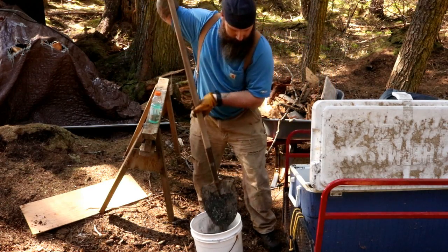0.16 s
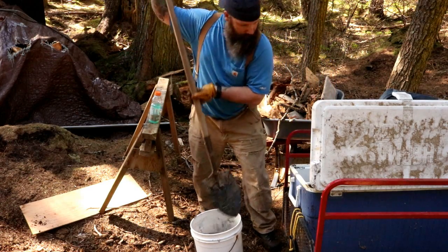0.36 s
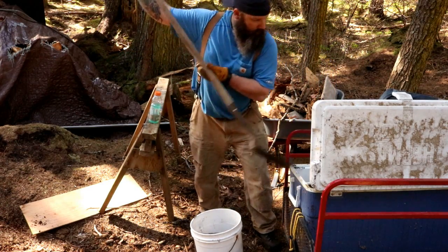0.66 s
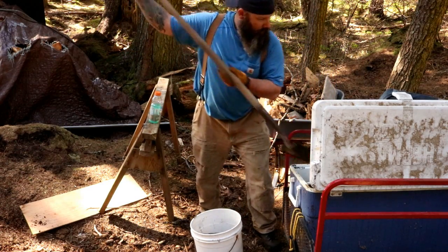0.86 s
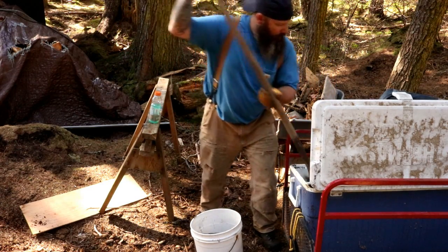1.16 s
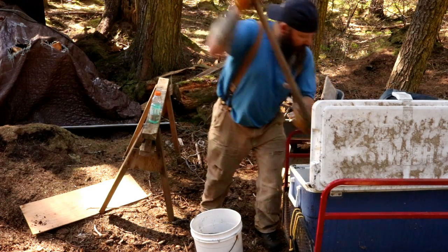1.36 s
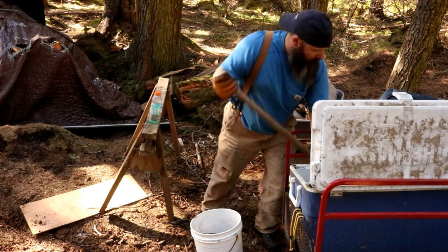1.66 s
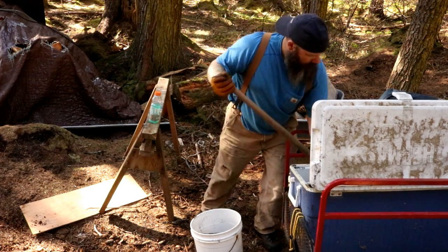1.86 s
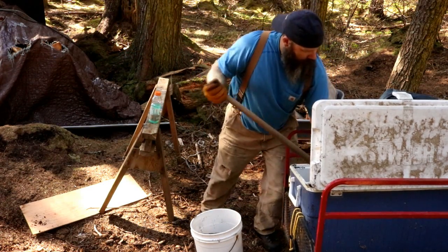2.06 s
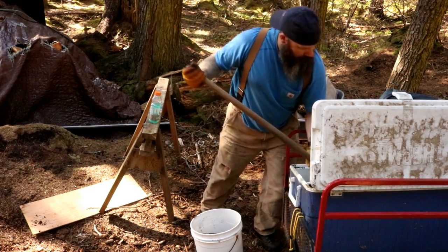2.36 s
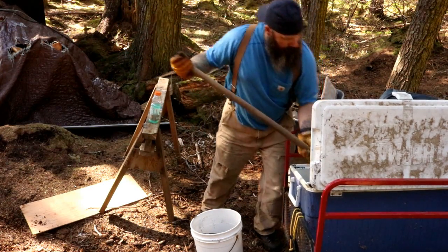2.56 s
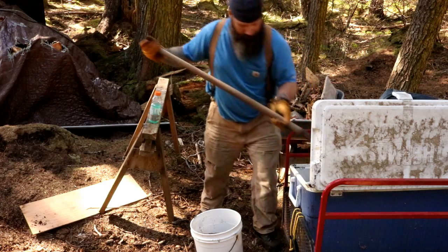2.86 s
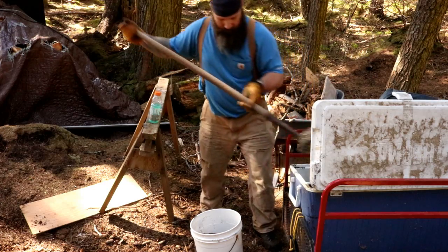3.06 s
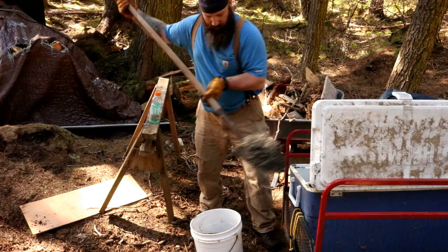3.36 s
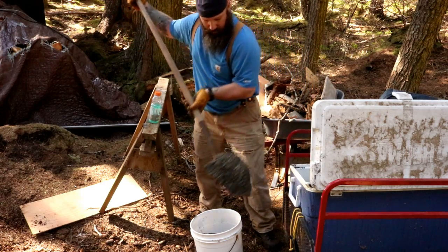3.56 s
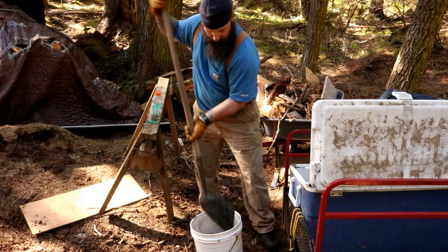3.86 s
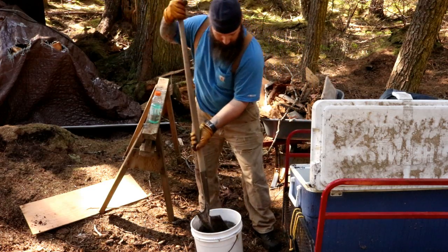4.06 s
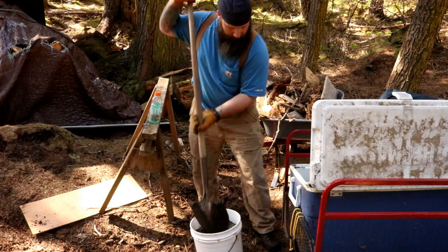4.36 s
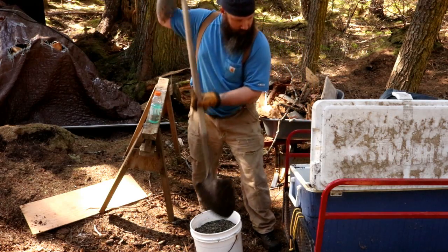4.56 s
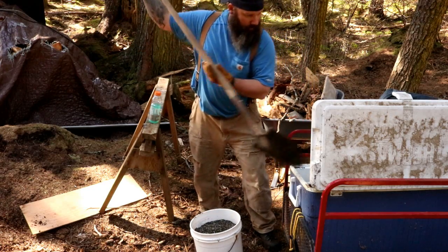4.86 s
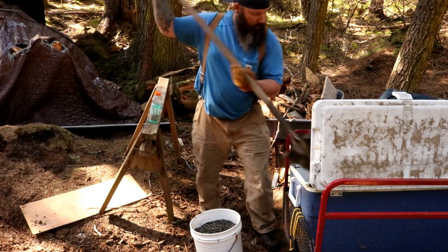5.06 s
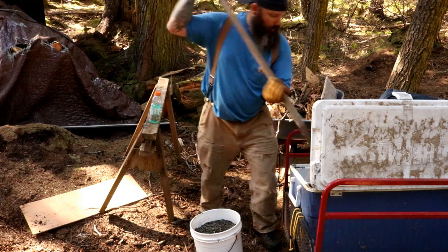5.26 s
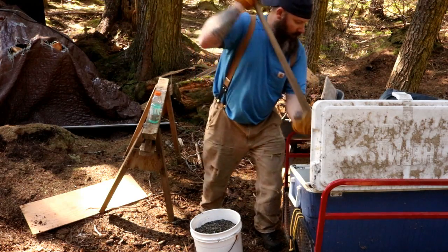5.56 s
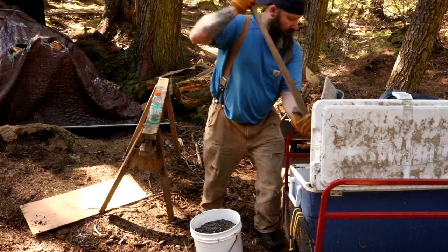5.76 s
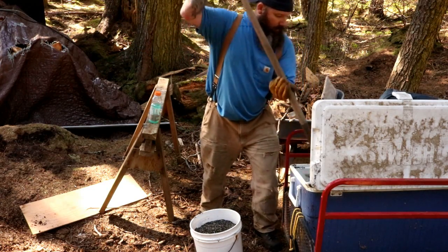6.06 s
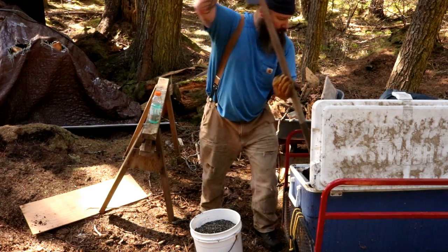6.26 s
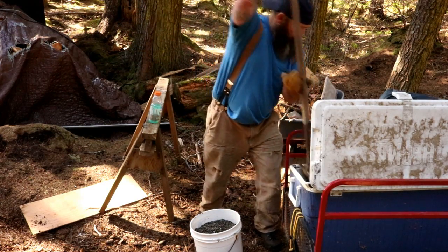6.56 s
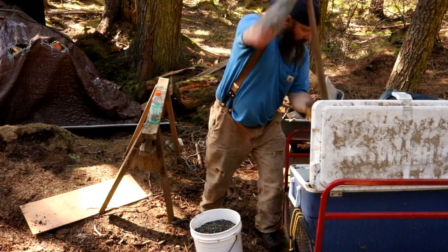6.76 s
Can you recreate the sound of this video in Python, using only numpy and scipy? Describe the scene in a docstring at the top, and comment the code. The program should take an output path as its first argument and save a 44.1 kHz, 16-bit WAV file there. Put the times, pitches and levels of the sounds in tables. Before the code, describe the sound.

Close outdoor sound of shovelling in a still wood with barely any echo. Faint grit falls first, then a loud cluster of boomy plastic thuds with steel clack, followed by a coarse crunching stroke. Soft hiss as sand is lifted, a pause, a dense splat of sand in a hollow bucket, a short metallic rub, then a second harsh dig and repeated plastic knocks.

```python
"""In a quiet wood, a steel shovel digs damp, gritty sand out of a big plastic tub and tips it into a plastic bucket.
The blade clacks against the tub (decaying tones and noise bursts) and grinds through the sand (random grain
clicks, coloured by resonances). Sand hisses off the blade, a load drops into the bucket, and stray pebbles tick.
Still air and a faint hum lie behind; the trees add a thin tail."""
import sys
import numpy as np
from scipy import signal
from scipy.fft import rfft, irfft, next_fast_len
from scipy.io import wavfile

SR = 44100
rng = np.random.default_rng(int(sys.argv[2]) if len(sys.argv) > 2 else 0)


def transcribe(signal):
    """Save signal, clipped to [-1, 1], as a 16-bit WAV file at the path in sys.argv[1]."""
    frames = np.atleast_2d(signal).T
    limited = np.clip(frames, -1, 1)
    pcm = np.round(limited * 32767).astype(np.int16)
    wavfile.write(sys.argv[1], SR, pcm)


N = 305613
TIME = np.arange(N) / SR   # s


def from_db(db):
    """Decibels to gain."""
    return 10 ** (np.asarray(db) / 20)


def rms_one(x):
    """Scale to unit power."""
    return x / np.sqrt(np.mean(x ** 2) + 1e-20)


def add(track, s, sound):
    """Mix a sound into the track at a time in seconds."""
    start = int(round(s * SR))
    track[start:start + len(sound)] += sound[:N - start]


def coloured(x, spectrum):
    """Shape how strong each pitch is in a steady signal; rms 1."""
    size = next_fast_len(len(x))
    hz, db = np.transpose(spectrum)
    bins = np.maximum(np.fft.rfftfreq(size, 1 / SR), 1)
    gain = from_db(np.interp(np.log(bins), np.log(hz), db))
    return rms_one(irfft(rfft(x, size) * gain, size)[:len(x)])


def resonate(x, hz, width):
    """A two-pole resonance with gain 1 on top."""
    r = np.exp(-np.pi * width / SR)
    feedback = [1, -2 * r * np.cos(2 * np.pi * hz / SR), r * r]
    return signal.lfilter(np.array([1, 0, -1]) * (1 - r * r) / 2, feedback, x)


def resonances(x, body):
    """The resonances of a body side by side."""
    return sum(from_db(db) * resonate(x, hz, width) for hz, width, db in body)


def through(x, body, ring_db):
    """Direct sound plus the resonances of a body; rms 1."""
    return rms_one(x + from_db(ring_db) * resonances(x, body))


def drift(rate):
    """Random wander with spread 1, so many turns a second."""
    knots = rng.standard_normal(4000)
    return rms_one(np.interp(TIME * rate, np.arange(len(knots)), knots))


def grains(per_s, spread_db):
    """Random grain clicks, a few much larger (or smaller, if the spread is negative); even power at any rate."""
    sizes = from_db(spread_db * np.minimum(rng.exponential(1, N), 5))
    signs = rng.choice([-1, 1], N)
    hits = rng.random(N) < per_s / SR
    return rms_one(sizes * signs * hits / np.sqrt(per_s))


def dying(t60, rise_s):
    """Half a second of envelope: a quick rise and an exponential fall by 60 dB in t60 seconds."""
    t = TIME[:SR // 2]
    return (1 - np.exp(-t / rise_s)) * np.exp(-np.log(1000) * t / t60)


def stretch(x):
    """Half a second from a random place in a steady signal."""
    start = rng.integers(N - SR // 2)
    return x[start:start + SR // 2]


def ringing(modes):
    """Free decay of lightly damped modes, each from a random phase."""
    t = TIME[:SR // 2]
    return sum(from_db(db) * np.sin(2 * np.pi * (hz * t + rng.random())) * dying(t60, rise_s=0.01)
               for hz, db, t60 in modes)


def struck(modes, centre_hz, damped_t60, octaves, rise_s, tail_db):
    """The spot that is hit favours modes near one pitch; blade and sand choke most of the ring, a tail stays."""
    t, out = TIME[:SR // 2], 0
    for hz, db, t60 in modes:
        distance = np.log2(hz / centre_hz) / octaves
        gain = from_db(db + rng.normal(0, 0.45)) / (1 + distance ** 2)
        shape = dying(damped_t60, rise_s) + from_db(tail_db) * dying(t60, rise_s)
        out = out + gain * np.sin(2 * np.pi * hz * t) * shape
    return out


def singing(body, waver_db):
    """Light friction keeps a body's resonances ringing, each wavering as the contact moves; rms 1."""
    friction = coloured(grains(per_s=6500, spread_db=2.5), [(600, -13), (1200, 4.0), (4200, -1.5), (6000, -11)])
    ring = sum(from_db(db + waver_db * drift(rate=25)) * resonate(friction, hz, width) for hz, width, db in body)
    return rms_one(ring + from_db(-19) * friction)


# a move softer than this level begins and ends more gradually, by this share per dB
GENTLE_DB, SLOWER_PER_DB = -51.5, 0.46


def gestures(rows, attack_s, release_s):
    """Each move rises, swells or fades evenly, and dies; the loudest leads.

    Gives the leader's dB, progress 0-1 and other columns. Rise and fall times are per 60 dB, longer if gentle.
    """
    level_db, progress, leader = np.full(N, -150.), np.zeros(N), np.zeros(N, int)
    for k, (start, end, first_db, last_db, *_) in enumerate(rows):
        done = np.clip((TIME - start) / (end - start), 0, 1)
        slow_in, slow_out = 1 + SLOWER_PER_DB * np.maximum(GENTLE_DB - np.array([first_db, last_db]), 0)
        before = np.maximum(start - TIME, 0) / (attack_s * slow_in)
        after = np.maximum(TIME - end, 0) / (release_s * slow_out)
        db = first_db + (last_db - first_db) * done - 60 * (before + after)
        leads = db > level_db
        level_db[leads], progress[leads], leader[leads] = db[leads], done[leads], k
    return level_db, progress, *np.array(rows)[leader, 4:].T


# how strong each pitch is in the still air: (pitch [Hz], level [dB per Hz])
AIR = [(15, -24), (25, -0.5), (102, -5), (175, -10.5), (285, -8), (344, -11), (463, -11.5), (545, -12.5),
       (624, -8), (677, -16), (1130, -14.5), (1440, -20), (3620, -24.5), (4490, -31.5), (16000, -34.5)]
# a faint far-off hum: (pitch [Hz], level [dB])
HUM = [(50.5, -77.5), (101.5, -75), (151, -75.5), (622, -75)]
AIR_DB = -61.5   # middle level; it wanders slightly


def background():
    """Still forest air, as coloured noise, with a faint hum of unsteady tones in it."""
    breeze_db = .5 * drift(rate=4)
    air = from_db(AIR_DB + breeze_db) * coloured(rng.standard_normal(N), AIR)
    hum = 0
    for hz, db in HUM:
        phase = 2 * np.pi * hz * TIME + 0.8 * drift(rate=5.9)
        hum = hum + from_db(db) * np.sqrt(2) * np.sin(phase)
    return air + hum


def trees(x, echo_db, t60):
    """Trunks scatter back a thin, dull tail."""
    scatter = coloured(rng.standard_normal(SR // 2),
                       [(80, 8.5), (400, -3), (2500, -2.5), (5000, -2.5), (14000, -12)])
    tail = scatter * dying(t60, rise_s=0.005)
    return from_db(echo_db) * signal.fftconvolve(x, tail / np.sqrt(np.sum(tail ** 2)))[:N]


# spells when smaller stones trickle off the tipped blade: (start [s], end [s])
TRICKLES = [(.02, .55), (3.751, 4.0)]
STONES_PER_S, STONE_DB, STONE_SPREAD_DB = 14, -55.5, 4.5   # level: middle and spread
STONE_HZ, STONE_SPREAD_OCTAVES = 3020, 1   # pitch: middle and spread


def small_stones():
    """Chance ticks while the blade is tipped, as rows like the pebbles'."""
    times = np.concatenate([rng.uniform(start, end, int(STONES_PER_S * (end - start))) for start, end in TRICKLES])
    chances = rng.standard_normal((len(times), 2))
    return [(s, STONE_DB + STONE_SPREAD_DB * loudness, STONE_HZ * 2 ** (STONE_SPREAD_OCTAVES * pitch))
            for s, (loudness, pitch) in zip(times, chances)]


# the clearest pebbles that fall or crack under the blade: (time [s], level [dB], middle pitch [Hz])
PEBBLES = [(0.166, -43.5, 1630), (0.314, -42.5, 1720), (.436, -39, 2040), (0.4593, -31.5, 1610),
           (0.5498, -43, 1700), (0.582, -41, 4900), (0.6884, -53, 12000), (0.7293, -45.5, 3420),
           (1.914, -44, 1700), (2.425, -35.5, 2400), (2.9552, -38, 3720), (3.089, -48.5, 3130),
           (3.107, -55, 9000), (3.335, -51, 3750), (3.351, -52, 6900), (3.367, -53, 13850),
           (3.773, -43.5, 6000), (3.78, -43, 6200), (3.807, -38, 6000), (3.816, -33, 6500),
           (3.882, -48, 8100), (4.083, -24.5, 1680), (4.2981, -28.5, 1440), (4.5198, -44.5, 1760),
           (5.3237, -23, 4300), (5.646, -27.5, 2250), (6.62, -32, 1910)]


def pebbles():
    """Each stone makes one short, broad tick of noise around its own pitch."""
    out, shape = np.zeros(N), dying(t60=0.019, rise_s=0.00032)
    for s, db, hz in PEBBLES + small_stones():
        hz = np.clip(hz, 800, SR / 3)
        tick = resonate(rng.standard_normal(SR // 2), hz, .75 * hz)
        band = signal.butter(1, [900, min(1.8 * hz, .44 * SR)], "band", fs=SR, output="sos")
        tick = signal.sosfilt(band, tick) * shape
        even = np.sqrt(np.sum(shape ** 2) / np.sum(tick ** 2))   # every tick the same energy before its level
        add(out, s, from_db(db) * tick * even)
    return out


# sand slides along the loaded blade, as it is levered and then lifted:
# (start [s], end [s], first level [dB], last level [dB])
SLIDES = [(1.66, 1.98, -51.5, -71.5), (2.12, 2.45, -58, -62.5), (2.5, 3.0, -63.5, -63.5)]
# from the lift on, less sand touches and the pitch climbs
LIFT_S, SLIDE_HZ, SLIDE_OCTAVES_PER_S, SLIDE_TOP_HZ = 1.79, 2200, 0.89, 4160


def sliding():
    """A broad, soft band of grain noise climbs as the load comes clear."""
    level_db, _ = gestures(SLIDES, attack_s=0.21, release_s=0.15)
    climb = SLIDE_OCTAVES_PER_S * np.maximum(TIME - LIFT_S, 0)
    centre_hz = np.minimum(SLIDE_HZ * 2 ** climb, SLIDE_TOP_HZ)
    out, power = np.zeros(N), 1e-12
    for hz in np.geomspace(700, 8000, num=15):
        narrow = signal.butter(2, [hz / 1.047, hz * 1.093], "band", fs=SR, output="sos")
        band = signal.sosfilt(narrow, grains(per_s=8100, spread_db=6.0))
        above = np.log2(hz / centre_hz)   # octaves; the band falls off faster upwards
        gain = from_db(-26 * np.maximum(above, 0) + 6.4 * np.minimum(above, 0))
        out, power = out + gain * rms_one(band), power + gain ** 2
    return from_db(level_db) * out / np.sqrt(power)


# the blade rubs along the bucket's wall: (start [s], end [s], first level [dB], last level [dB])
RUBS = [(4.24, 4.35, -53.5, -48), (4.36, 4.435, -52.5, -53)]
# resonances of the blade pressed on the bucket: (pitch [Hz], width [Hz], level [dB])
PRESSED_BLADE = [(1335, 13, -2), (1800, 29, -9), (2140, 85, -7.5), (2850, 25, -4), (3040, 50, -10),
                 (3410, 66, 0), (3750, 58, -2.5)]


def rubbing():
    """The emptied blade sings against the bucket's wall."""
    level_db, _ = gestures(RUBS, attack_s=.2, release_s=0.13)
    return from_db(level_db) * singing(PRESSED_BLADE, waver_db=2.0)


# falls of sand into the bucket:
# (start [s], end [s], first level [dB], last level [dB], fine hiss against the grit [dB])
POURS = [(0, .17, -57.5, -71.5, -7), (.27, .42, -62, -66, -10), (.465, .56, -51.5, -63.5, -5.5),
         (.69, .95, -75.5, -94, 8.5), (3.808, 3.84, -56.5, -50, 2.5), (3.87, 4.0, -66.5, -50.5, -2.5),
         (4.02, 4.09, -33, -38, -5), (4.1, 4.15, -43.5, -48, -5.5), (4.16, 4.3, -57, -51, -4),
         (4.31, 4.5, -54, -61.5, -2.5), (4.523, 4.605, -53, -48.5, -9)]
# resonances of the bucket that colour the grit: (pitch [Hz], width [Hz], level [dB])
BUCKET = [(925, 63, 11), (1150, 62, -9), (1322, 41, 7.5), (1540, 180, 5.5), (1966, 94, 2), (2414, 44, 8),
          (2750, 64, -4), (3580, 82, 1)]
# how strong each pitch is in the falling grit, its rumble and its hiss: (pitch [Hz], level [dB per Hz])
POUR_GRIT = [(500, -54), (800, -18), (1050, 4.5), (2200, 2.5), (3600, 3), (4600, -14), (7000, -29.5),
             (12000, -24)]
POUR_RUMBLE = [(40, -28), (120, 2), (220, 2), (350, -8), (500, -5), (850, 3), (1500, -2)]
POUR_HISS = [(3000, -7.5), (5000, -5), (6500, -4.5), (10000, -8), (15000, -11), (17000, -79)]
BUCKET_RUMBLE_DB = -20.5   # against the grit


def pouring():
    """Clumps of sand patter into the bucket and sound its hollow; a thin trickle is heard grain by grain."""
    grit_db, _, hiss_db = gestures(POURS, attack_s=0.047, release_s=.09)
    flow = np.clip(from_db(.7 * (grit_db + 34.5)), .1, 1)   # share of the full rate of grains
    grit = through(coloured(grains(per_s=7000 * flow, spread_db=2.0), POUR_GRIT), BUCKET, ring_db=-2.5)
    rumble = from_db(BUCKET_RUMBLE_DB) * coloured(grains(per_s=870, spread_db=-5.0), POUR_RUMBLE)
    hiss = from_db(hiss_db) * coloured(grains(per_s=12000 * flow, spread_db=-3.0), POUR_HISS)
    clump_db = 1.3 * drift(rate=150)
    return from_db(grit_db + clump_db) * (grit + rumble + hiss)


# blows of the blade, and the load landing in the bucket (4.02-4.08 s):
# (time [s], wall thud level [dB], thud middle pitch [Hz], knock level [dB],
# knock middle pitch [Hz], steel clack level [dB], gritty snap level [dB], 60 dB decay of the choked ring [s])
IMPACTS = [(1.0311, -8.5, 216, -10.5, 534, -17.5, -19, 0.054),
           (1.0527, -40, 180, -20, 670, -26.5, -20, 0.053),
           (1.0757, -8.5, 152, -22, 700, -22.5, -16.5, .036), (1.0828, -4, 185, -7.5, 430, -31, -43, 0.042),
           (1.114, -23, 220, -19, 364, -64, -65, .056), (1.464, -35, 177, -28, 745, -44, -46, 0.047),
           (2.1759, -15, 142, -16.5, 577, -29, -51, 0.029),
           (2.424, -23.5, 131, -45, 590, -36.5, -66, 0.053),
           (4.0231, -33, 220, -21, 960, -30.5, -41, 0.037), (4.034, -32, 230, -27, 344, -35.5, -46, 0.029),
           (4.081, -28, 230, -32, 900, -40, -48, 0.029), (4.2988, -38.5, 232, -31, 960, -42.5, -63, .035),
           (5.297, -53, 200, -29.5, 410, -36.5, -61, 0.22), (5.323, -21.5, 143, -18.5, 392, -22, -42, .11),
           (5.645, -40, 188, -32, 870, -35, -54, 0.05), (6.0283, -4.5, 215, -16, 424, -30, -39, 0.044),
           (6.2199, -13.5, 219, -8.5, 480, -29, -50, .042), (6.431, -32, 168, -25, 724, -27.5, -57, 0.064),
           (6.4914, -30.5, 187, -29.5, 506, -25, -56, .074),
           (6.6174, -30, 210, -24.5, 676, -27.5, -58, 0.052),
           (6.7287, -17, 200, -11.5, 645, -28, -48, 0.058), (6.736, -20.5, 146, -38, 503, -30, -31, 0.055)]
# plastic walls flexing as a whole: (pitch [Hz], level [dB], 60 dB decay [s])
WALL_MODES = [(90, 1, 0.11), (116, 1.5, 0.12), (159, -2.5, 0.13), (206, 1, 0.24), (235, -16, .07)]
# stiffer plastic panels: (pitch [Hz], level [dB], 60 dB decay [s])
PANEL_MODES = [(320.5, -1, 0.66), (391, -4.5, 0.37), (425.6, -1, 0.072), (475, -2.5, 0.073),
               (571, -5, 0.06), (623, -4, 0.08), (690, -12, 0.15), (819, -0.5, 0.22), (943, -19.5, 0.14),
               (990, -9, 0.67), (1183, -8, 0.1)]
# panel modes that hum on after a thud: (pitch [Hz], level against the thud [dB], 60 dB decay [s])
AFTER_RING = [(306, -41, 0.4), (375.5, -27, 0.2), (417.4, -26, 0.16)]
# the blade's bending, which rings on with the snap: (pitch [Hz], level against the snap [dB], 60 dB decay [s])
BENDING_MODES = [(818, -31, .7), (1001, -26, .45), (1055, -35, .32), (1556, -38, .35), (1852, -27, .15),
                 (2089, -33, .18)]
# how strong each pitch is in the steel clack and the gritty snap: (pitch [Hz], level [dB per Hz])
CLACK = [(200, -57), (600, 4), (1000, 6.5), (2000, 1), (3600, 4.5), (4500, -6), (5500, -13), (7500, -17.5),
         (15000, -27)]
SNAP = [(2500, -26), (4800, 5), (7000, -2), (9500, -5), (13500, 1.5), (16000, 7)]
# resonances of the blade, for its clacks and its digging: (pitch [Hz], width [Hz], level [dB])
BLADE = [(670, 45, 10.5), (968, 47, 3.5), (1550, 210, -1.5), (1490, 68, 3), (1700, 220, 5.5),
         (2056, 140, 2), (2330, 30, 1.5), (3090, 75, -9), (3720, 81, -17)]


def impacts():
    """Blows and the landing load: plastic thuds and knocks, sand-damped steel clacks, crushed grit snaps."""
    steel = through(coloured(rng.standard_normal(N), CLACK), BLADE, ring_db=-19.0)
    crushed = coloured(rng.standard_normal(N), SNAP)
    clack_shape = dying(t60=0.035, rise_s=0.00057) + from_db(-5.5) * dying(t60=0.11, rise_s=0.0053)
    snap_shape = dying(t60=0.031, rise_s=0.00054)
    out = np.zeros(N)
    for s, thud_db, thud_hz, knock_db, knock_hz, clack_db, snap_db, t60 in IMPACTS:
        thud = struck(WALL_MODES, thud_hz, t60, octaves=0.32, rise_s=0.0051, tail_db=-33)
        thud = thud + ringing(AFTER_RING)
        knock = struck(PANEL_MODES, knock_hz, t60, octaves=0.32, rise_s=0.0028, tail_db=-32.0)
        clack = stretch(steel) * clack_shape
        snap = stretch(crushed) * snap_shape + ringing(BENDING_MODES)
        plastic = from_db(thud_db) * thud + from_db(knock_db) * knock
        add(out, s, plastic + from_db(clack_db) * clack + from_db(snap_db) * snap)
    # the blows carry no deep bass
    return signal.sosfilt(signal.butter(2, 65, "high", fs=SR, output="sos"), out)


CRUNCHES_PER_S = 420   # all stone sizes together
CLUMP_DB, CLUMPS_PER_S = 4, 22   # swing of each stone size's level


def crunches():
    """Coarse stones crack, each ringing a few cycles; stones of one size come in clumps. Rms 1."""
    pitches, out = np.geomspace(750, 3800, num=10), 0
    for hz in pitches:
        hits = grains(per_s=CRUNCHES_PER_S / len(pitches), spread_db=2.0)
        cracks = resonate(hits + 1e-18, hz, 0.075 * hz)
        out = out + rms_one(cracks) * from_db(CLUMP_DB * drift(CLUMPS_PER_S))
    return rms_one(out)


# strokes of the blade through sand; the first row is sand running off the tipped blade:
# (start [s], end [s], first level [dB], last level [dB], first depth [0-1], last depth [0-1])
BLADE_MOVES = [(0, .3, -63.5, -72, 0.01, 0), (1.249, 1.36, -45, -38, 0.02, 0.19),
               (1.37, 1.472, -34.5, -28, 0.08, 0.26), (1.48, 1.615, -39, -38, 0.23, 0.41),
               (1.63, 1.85, -45, -61, 0.67, 1), (1.86, 2.14, -64.5, -57.5, 0.96, 0.9),
               (2.162, 2.183, -38.5, -38.5, 0.33, 0.32), (2.2, 2.45, -56.5, -52, 0.23, 0.42),
               (5.315, 5.5, -36.5, -38.5, 0.27, .18), (5.51, 5.648, -34, -33.5, .17, 0.37),
               (5.68, 5.8, -57, -66.5, 0.7, 0.8), (5.81, 5.875, -64.5, -54.5, 0.04, 0.06),
               (5.88, 6.02, -54.5, -61, 0, 0), (6.195, 6.228, -51.5, -42, 0, 0.11),
               (6.25, 6.34, -57, -65.5, .05, 0.06), (6.36, 6.425, -63.5, -43, 0.1, .1),
               (6.428, 6.442, -34.5, -33, .25, 0.62), (6.46, 6.6, -46, -56, 0.47, 0.01),
               (6.6, 6.75, -49, -29, 0.04, 0.23), (6.755, 6.84, -32.5, -36, 0.14, 0.43),
               (6.87, 6.93, -53.5, -49, 0.3, 0.5)]
# resonances of the free steel blade: (pitch [Hz], width [Hz], level [dB])
FREE_BLADE = [(1340, 110, -8), (2060, 90, -3), (2330, 70, -5), (2760, 60, -7), (3100, 160, 1),
              (3500, 140, 0), (3780, 120, -6), (4240, 130, -9)]
# how strong each pitch is in the grit, its rumble and its hiss: (pitch [Hz], level [dB per Hz])
DIG_GRIT = [(300, -39), (600, -2.5), (1000, -2.5), (2200, -1), (3000, 0), (3800, 2), (4500, -12.5),
            (6000, -27), (10000, -61)]
DIG_RUMBLE = [(15, -55), (40, -10), (70, -3.5), (120, -5), (200, 8), (290, 3), (450, 5), (750, -3.5),
              (1100, -3), (2000, -63)]
DIG_HISS = [(3000, -8.5), (4800, 0.5), (7000, -3), (10000, -7), (15000, -15.5), (17000, -56)]
# a shallow blade sings and hisses, a buried one is muffled and shakes the tub:
# level against the grit at the surface, and change at full depth
SING_DB, SING_DEPTH_DB = 5, -51
HISS_DB, HISS_DEPTH_DB = -5.5, -40
RUMBLE_DB, RUMBLE_DEPTH_DB = -9.5, 9.5
MUFFLE_PER_DEPTH = 2   # fully muffled from half depth on
CRUNCH_DB = -4   # against the bare grit, before the blade's resonances


def digging():
    """Grains stick and slip on the blade, ring its steel and shake the tub; depth sets the balance.

    The first move is sand running off the tipped blade, made the same way.
    """
    grit_db, progress, first_depth, last_depth = gestures(BLADE_MOVES, attack_s=0.042, release_s=0.063)
    depth = np.clip(first_depth + (last_depth - first_depth) * progress, 0, 1)
    buried = np.clip(MUFFLE_PER_DEPTH * depth, 0, 1)
    slips = coloured(grains(per_s=4500, spread_db=2.0), DIG_GRIT)
    bare = through(slips + from_db(CRUNCH_DB) * crunches(), BLADE, ring_db=-7.0)
    muffled = coloured(bare, [(2000, -4.5), (2400, 0), (2800, -11), (3800, -11.0), (6000, -7)])
    grit = (1 - buried) * bare + buried * muffled
    rumble = coloured(grains(per_s=1500, spread_db=2.5), DIG_RUMBLE)
    rumble = from_db(RUMBLE_DB + RUMBLE_DEPTH_DB * depth) * rumble
    hiss = coloured(grains(per_s=13000, spread_db=2.5), DIG_HISS)
    hiss = from_db(HISS_DB + HISS_DEPTH_DB * depth) * hiss
    steel = from_db(SING_DB + SING_DEPTH_DB * depth) * singing(FREE_BLADE, waver_db=2.5)
    slip_db = 0.77 * drift(rate=130)
    return from_db(grit_db + slip_db) * (grit + rumble + hiss + steel)


def scene():
    """The shovel work among the trees."""
    air = background()
    work = digging() + sliding() + pouring() + rubbing() + impacts() + pebbles()
    return (work + trees(work, echo_db=-25.0, t60=0.51) + air)[None]


def record(dry):
    """The top is cut steeply above 16 kHz."""
    return signal.sosfilt(signal.ellip(10, .1, 80, 16000, fs=SR, output="sos"), dry)


dry = scene()
out = record(dry)
transcribe(out)
```